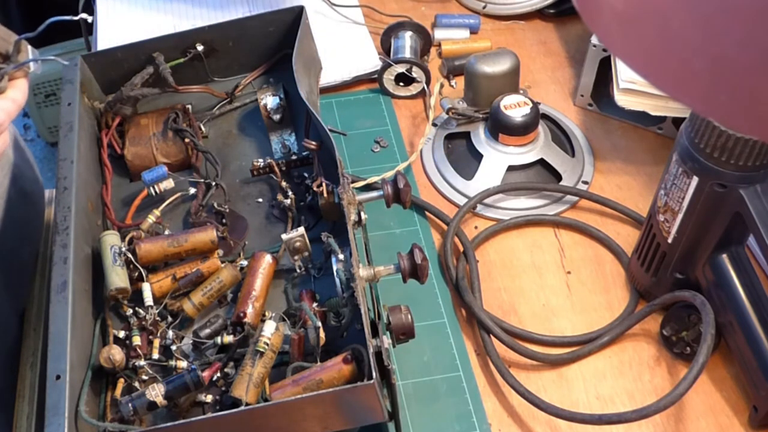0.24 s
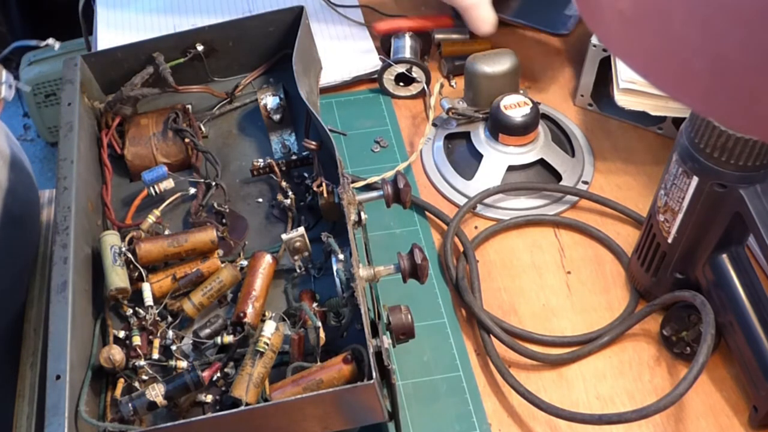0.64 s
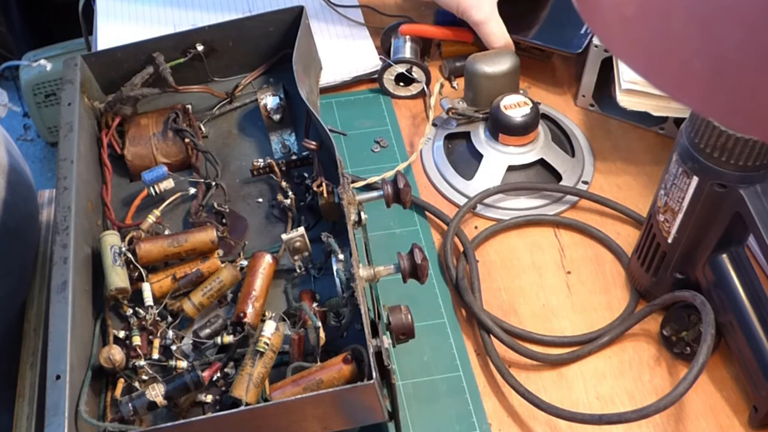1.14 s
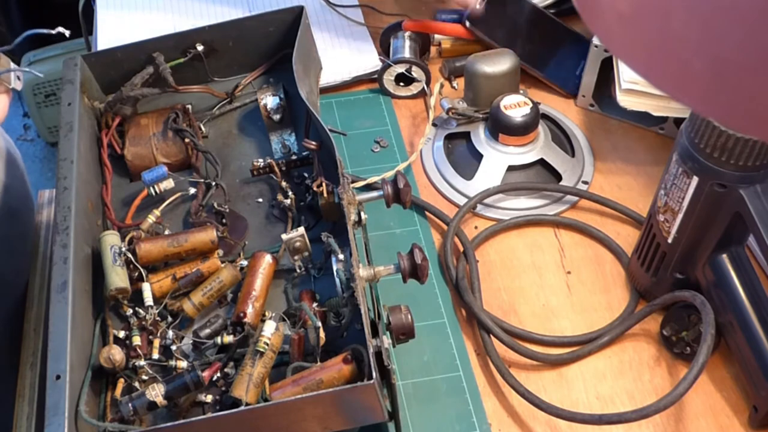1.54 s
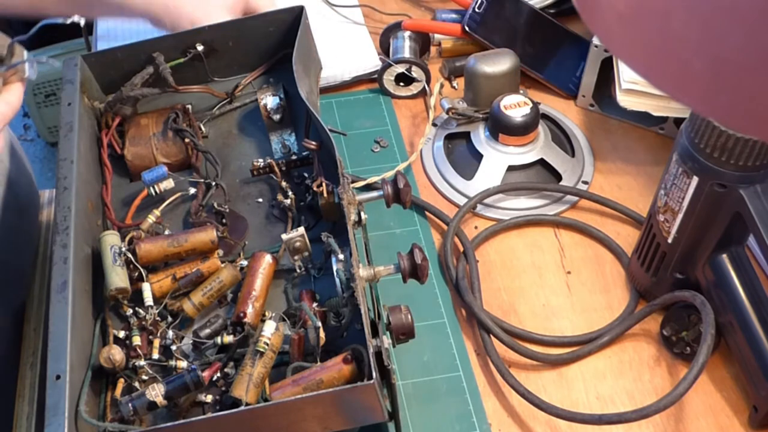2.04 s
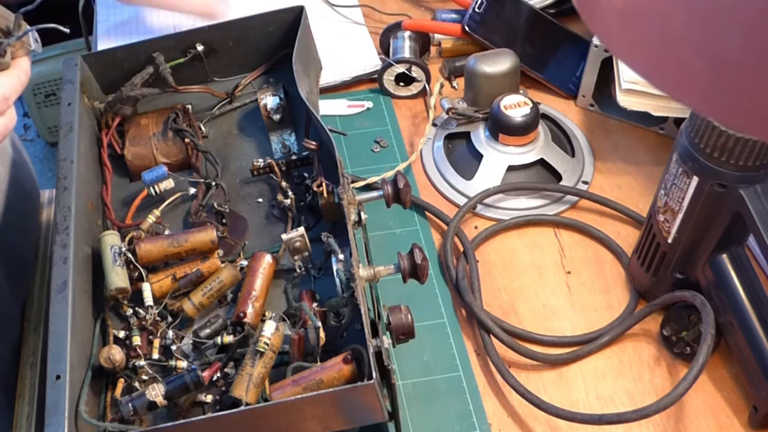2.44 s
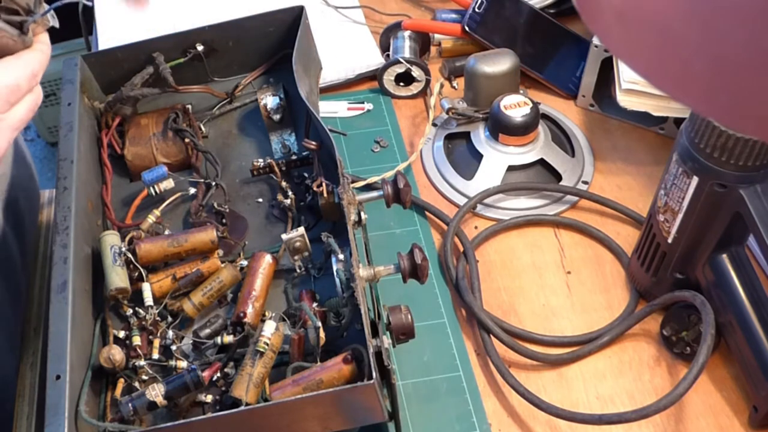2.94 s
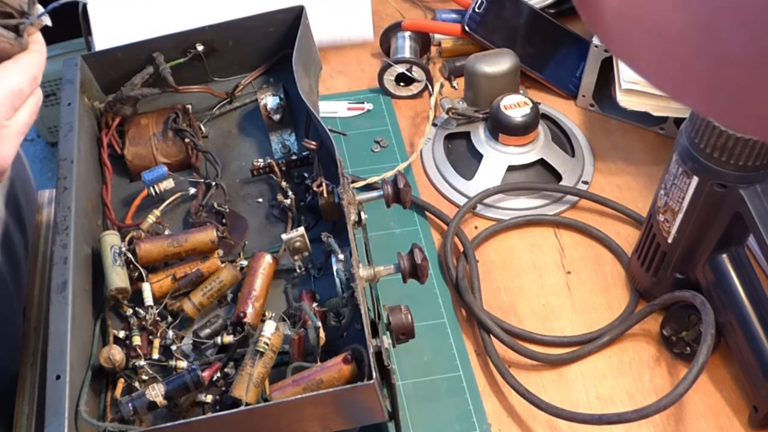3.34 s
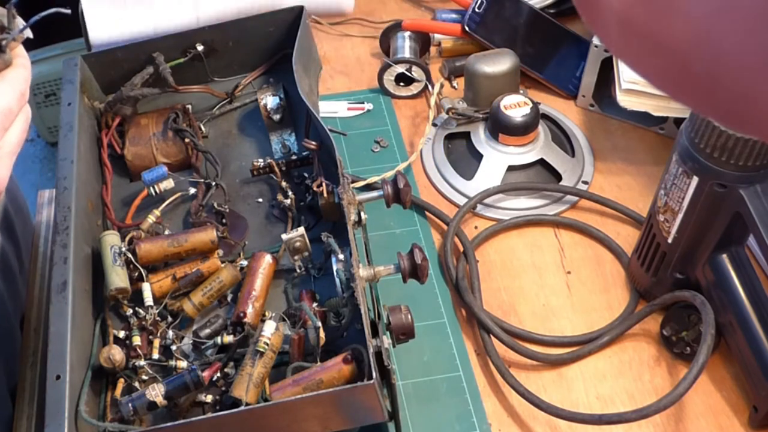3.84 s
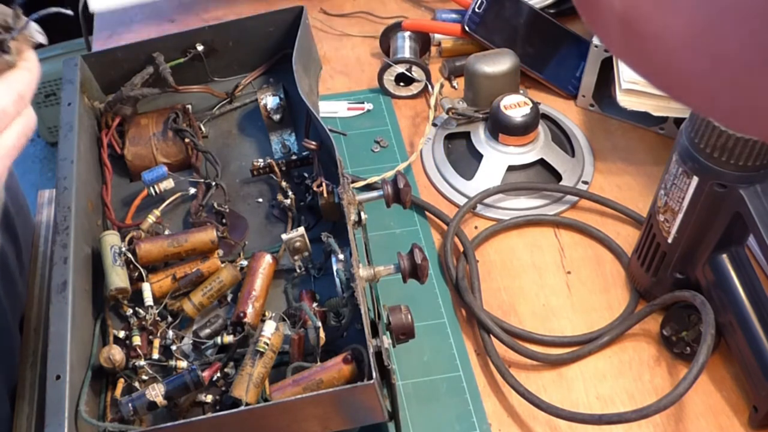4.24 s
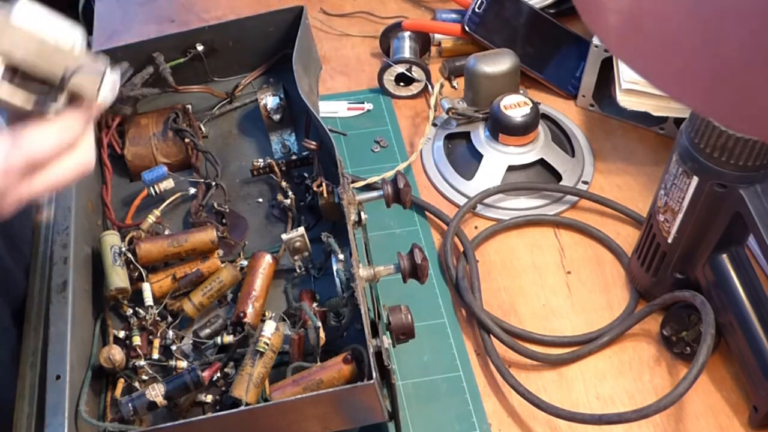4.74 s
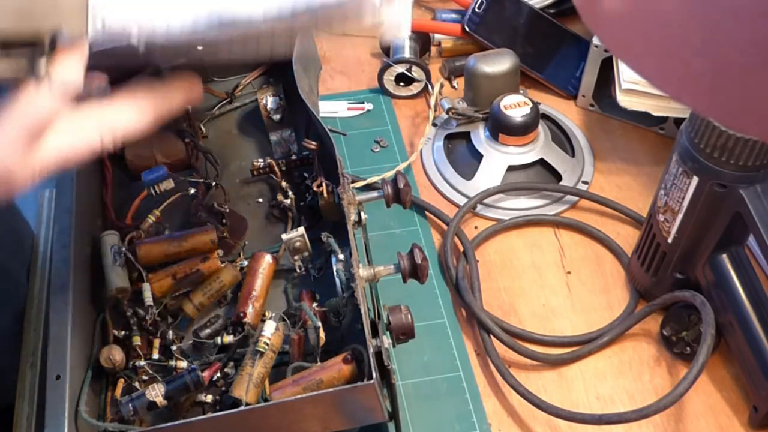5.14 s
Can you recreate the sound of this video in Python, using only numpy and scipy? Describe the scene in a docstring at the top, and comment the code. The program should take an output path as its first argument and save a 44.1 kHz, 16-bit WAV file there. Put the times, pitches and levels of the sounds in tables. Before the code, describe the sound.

A small quiet room with faint dull steady noise and a barely wavering drone; close microphone at a wooden bench, slight stereo width and short reflections. Tiny metal touches and a faint flick at 0.4-0.5 s. From 0.8 s a tablet bumps down, strongest at 0.9 and 1.35 s, low and woody with a brief clack; grainy low drags follow at 0.9-1.1 s, and more bumps at 1.53-1.61 s lead to a short judder. A bright sleeve swish lies over this until about 1.6 s. A papery brush at 1.9 s, a crisp flick at 2.23 s, then dense rustles and snaps from 2.6 to 3.6 s, with a hollow pop at 3.23 s. Two hard edge knocks ring out at 3.92 and 4.11 s, the second louder. Then near quiet: thin high squeaks at 4.5-5.3 s, a light metal clink at 5.08 s, faint taps and a final crisp rustle at 5.3-5.4 s.

```python
"""A wooden workbench in a small room, heard from close by, as space is cleared with a metal part in one hand.
A sleeve swishes and a tablet bumps and drags on the bench: ringing modes, bursts of contact and shaped noise.
Papery noise swells and fades under gain curves, sheets flick and pop; a pad taps, with two firm knocks on its edge.
Small metal clinks (damped sines) and thin squeaks (gliding tones) come between.
A faint steady room noise with a wavering drone lies under it."""
import sys
import numpy as np
from scipy import signal
from scipy.fft import rfft, irfft
from scipy.io import wavfile

SR = 44100
rng = np.random.default_rng(int(sys.argv[2]) if len(sys.argv) > 2 else 0)


def wav_record(signal):
    """Record a signal, one row per channel, as 16-bit PCM in the file named by sys.argv[1]."""
    frames = np.transpose(np.atleast_2d(signal))
    bounded = np.clip(frames, -1, 1)
    # unit amplitude maps onto the largest positive 16-bit level
    quanta = np.round(bounded * 32767).astype(np.int16)
    wavfile.write(sys.argv[1], SR, quanta)


N = 238051
TIME = np.arange(N) / SR
BLOW = np.arange(SR // 2) / SR  # time since a contact, s
ATTACK = int(.03 * SR)  # opening of a blow that sets its level, samples

# Event levels in the tables stand ahead of the final balance in scene().


def from_db(db):
    """Turns decibels into an amplitude factor."""
    return 10 ** (np.asarray(db) / 20)


def rms_one(x):
    """Scales a sound to rms 1 over its whole length."""
    return x / np.sqrt(np.mean(x ** 2) + 1e-20)


def attack_one(x):
    """Scales a blow to rms 1 over its first 30 ms."""
    return x / np.sqrt(np.mean(x[..., :ATTACK] ** 2) + 1e-20)


def at_hz(points, hz):
    """Reads a table on a log-frequency axis."""
    f, value = np.transpose(points)
    return np.interp(np.log(np.maximum(hz, 1)), np.log(f), value)


def add(out, s, sound):
    """Mixes a sound in at time s."""
    start = int(s * SR)
    out[..., start:start + sound.shape[-1]] += sound[..., :N - start]


def colour(x, spectrum):
    """Causal (minimum-phase) filter with the given spectrum, falling steeply outside it."""
    size = 4096
    hz = np.maximum(np.fft.rfftfreq(size, 1 / SR), 5)
    octaves_outside = np.abs(np.log2(hz / np.clip(hz, spectrum[0][0], spectrum[-1][0])))
    level_db = at_hz(spectrum, hz) - 18 * np.minimum(octaves_outside, 2)
    # folding the cepstrum onto positive time makes the phase minimal
    cepstrum = irfft(np.log(from_db(level_db)))
    cepstrum[1:size // 2] *= 2
    cepstrum[size // 2 + 1:] = 0
    impulse = irfft(np.exp(rfft(cepstrum)))
    return signal.fftconvolve(x, impulse)[:len(x)]


def drift(rate):
    """Slow random wander of rms 1, with new values at the given rate in Hz."""
    knots = rng.standard_normal(4096)
    return rms_one(np.interp(TIME * rate, np.arange(len(knots)), knots))


def widen(mid, side):
    """Left and right from two unrelated sounds, with a width set for each frequency."""
    # width of diffuse sound: f/Hz, side minus mid/dB
    width = [(30, -16), (100, -5.5), (280, -18), (500, -8), (1000, -2), (4000, -7.5), (8000, -5),
             (13000, -3)]
    hz = np.fft.rfftfreq(len(side), 1 / SR)
    side = irfft(rfft(side) * from_db(at_hz(width, hz)), len(side))
    return np.array([mid + side, mid - side])


def room_response(wet_db, early_db, early_s):
    """Direct sound, dense early scatter off the clutter on the bench, and a tail that dies band by band."""
    # room decay: f/Hz, t60/s
    room_t60 = [(150, 0.42), (500, 0.27), (1200, 0.3), (4000, 0.26), (12000, 0.28)]
    edges = np.geomspace(100, 16000, 8)
    tails = np.zeros((2, len(BLOW)))
    for low, high in zip(edges, edges[1:]):
        band_filter = signal.butter(2, [low, high], "band", fs=SR, output="sos")
        band = signal.sosfilt(band_filter, rng.standard_normal(tails.shape))
        tails += band * from_db(-60 * BLOW / at_hz(room_t60, np.sqrt(low * high)))
    early_boost = 1 + from_db(early_db) * np.exp(-BLOW / early_s)
    onset = np.clip(BLOW / 0.0021 - .5, 0, 1)  # scatter fades in after about 1 ms
    tails *= early_boost * onset
    response = from_db(wet_db) * widen(*tails) / np.sqrt(np.sum(tails[0] ** 2))
    response[:, 0] += 1
    return response


def heard(x, room):
    """A sound as it reaches left and right through the room."""
    return np.array([signal.fftconvolve(x, side)[:len(x)] for side in room])


def ring(modes, favoured_hz, focus_db):
    """Damped sines; the point of contact favours the modes near one pitch."""
    hz, level_db, t60 = np.transpose(modes)[:, :, None]
    focus = focus_db * np.log2(hz / favoured_hz) ** 2
    strength = from_db(level_db - focus + rng.standard_normal(hz.shape))
    sign = (-1) ** (np.arange(len(hz))[:, None] // 2)
    decay = np.exp(-np.log(1000) * BLOW / t60)
    return np.sum(sign * strength * np.sin(2 * np.pi * hz * BLOW) * decay, axis=0)


def contact(length_ms, first_db, grain_db):
    """A first touch, then a dying burst of tiny collisions as the surfaces settle."""
    length = max(length_ms, .3) / 1000
    grain = from_db(grain_db * rng.standard_normal(len(BLOW)))
    burst = rng.standard_normal(len(BLOW)) * grain * np.exp(-BLOW / length)
    burst /= np.sqrt(np.sum(burst ** 2))
    burst[0] += from_db(first_db) / np.sqrt(max(length_ms, 1))
    return burst


def gestures(rows):
    """Each row swells, holds and dies away by 20 dB per release time; one gain curve per level column."""
    gains = 0
    for start_s, attack_s, hold_s, release_s, *levels_db in rows:
        rise = np.clip((TIME - start_s) / attack_s, 0, 1)
        fall = np.clip((TIME - start_s - attack_s - hold_s) / release_s, 0, 10)
        gains = gains + from_db(levels_db)[:, None] * rise * from_db(-20 * fall)
    return gains


def friction(gain, spectrum, grain_db, catch_db):
    """Surfaces catch and let go: noise of dense uneven slips, coming in clumps."""
    clumps = from_db(grain_db * drift(600) + catch_db * drift(70))
    slips = rng.standard_normal(N) * clumps
    return gain * rms_one(colour(slips, spectrum))


def room_noise():
    """Dull steady noise with a few wavering tones in it."""
    # colour of the noise: f/Hz, level/dB
    ambience = [(15, -66), (25, -3), (37, -18.5), (144, -12.5), (371, -9.5), (513, -10.5), (1510, -18.5),
                (1870, -22.5), (2730, -28), (4820, -28), (15800, -31.5)]
    # faint wavering drone of the room: f/Hz, level/dB
    drone_tones = [(328, -72.5), (511, -70.5), (1044, -75.5)]
    noise = widen(*[colour(rng.standard_normal(N), ambience) for side in range(2)])
    drone = np.zeros(N)
    for tone_hz, level_db in drone_tones:
        hz = tone_hz + 7.25 * drift(44)  # waver in Hz
        drone += from_db(level_db) * rms_one(np.sin(2 * np.pi * np.cumsum(hz) / SR))
    return from_db(-60.5) * rms_one(noise) + drone


def squeaks():
    """As the grip slips, stick and slip locks into a thin, unsteady tone for a moment."""
    # faint squeaks: t/s, length/s, start f/Hz, end f/Hz, level/dB
    squeak_rows = [(4.5, .08, 10000, 9750, -71), (4.65, .12, 9250, 9250, -66),
                   (4.74, .09, 10300, 10500, -68), (4.84, .08, 10200, 10850, -64),
                   (5.03, .1, 11700, 12000, -68), (5.14, .17, 4700, 4700, -67)]
    out = np.zeros(N)
    for s, length_s, start_hz, end_hz, level_db in squeak_rows:
        size = int(length_s * SR)
        glide_hz = np.linspace(start_hz, end_hz, size)
        hz = glide_hz * (1 + 0.013 * drift(550)[:size])
        tone = np.sin(2 * np.pi * np.cumsum(hz) / SR)
        add(out, s, from_db(level_db) * rms_one(signal.windows.tukey(size) * tone))
    return out


def sleeve_swish():
    """Cloth brushing past in one long reach: bright friction noise."""
    # the reach: start t/s, attack/s, hold/s, release/s, level/dB
    reach = [(0.705, 0.18, .5, 0.27, -50.5)]
    # colour of the cloth: f/Hz, level/dB
    swish = [(2500, -10.5), (4500, -11), (6200, -2), (8300, 1.5), (10500, -4.5), (13000, -4.5),
             (15000, -29)]
    gain, = gestures(reach)
    return friction(gain, swish, grain_db=-0.8, catch_db=0.55)


def papery_noise():
    """Swells of clumpy noise, papery in sound: a bright hiss and a lower rasp, each with its own level."""
    # swells, two of them starting just ahead of the pad's firm knocks:
    # start t/s, attack/s, hold/s, release/s, hiss level/dB, rasp level/dB
    swells = [(1.863, 0.013, 0.053, 0.071, -47, -52), (2.182, 0.01, 0.013, 0.044, -57.5, -71),
              (2.232, 0.0091, 0.018, 0.081, -41.5, -51.5), (2.634, 0.01, .008, 0.067, -44.5, -55),
              (2.718, 0.025, 0.0091, 0.047, -42.5, -44), (2.765, 0.017, 0.015, 0.084, -41, -44),
              (2.89, 0.016, 0.017, 0.046, -57, -54.5), (2.918, 0.04, 0.018, 0.13, -37.5, -46.5),
              (3.0, 0.057, 0.018, 0.2, -46, -44.5), (3.23, 0.11, 0.021, 0.063, -42.5, -42.5),
              (3.36, 0.056, .025, 0.19, -51, -65), (3.47, 0.079, 0.031, 0.081, -41.5, -59.5),
              (3.648, 0.0076, .012, 0.21, -50.5, -51), (3.913, 0.0063, 0.0084, 0.1, -34, -31.5),
              (4.101, 0.0053, 0.003, 0.013, -34.5, -31), (4.45, .22, .02, 0.64, -63.5, -60.5),
              (4.86, 0.11, 0.04, .1, -60, -59.5), (5.08, 0.14, 0.086, .1, -62, -59.5),
              (5.31, 0.028, .015, 0.058, -46, -56.5), (5.375, 0.01, .015, .05, -44, -53.5)]
    # colours: f/Hz, level/dB
    hiss_colour = [(2200, -11.5), (3300, -15), (5000, 0), (7000, 1), (9500, 2), (12000, -2.5), (15000, -18)]
    rasp_colour = [(130, -11.5), (330, 0.5), (550, 3), (1050, 0.5), (1800, -1.5), (3100, -6.5), (4500, -4)]
    hiss_gain, rasp_gain = gestures(swells)
    hiss = friction(hiss_gain, hiss_colour, grain_db=2.0, catch_db=1.84)
    rasp = friction(rasp_gain, rasp_colour, grain_db=1.5, catch_db=2.0)
    return hiss + rasp


def clinks(room):
    """Light touches on metal, damped by the fingers: a brief scuff and a short ring."""
    # the part touching things: t/s, level/dB, favoured f/Hz
    touches = [(0.405, -70, 4200), (0.518, -63, 1320), (5.0752, -46, 3350), (5.087, -50, 1150)]
    # ringing of the metal part: f/Hz, level/dB, t60/s
    metal_modes = [(1244, 0, .06), (1580, -7, .04), (2150, -9, .025), (2466, -2, .04), (3246, 2, .035),
                   (3924, -7, .045), (4818, -7, .06), (6605, -3, .04), (7278, -1, .05)]
    out = np.zeros((2, N))
    for s, level_db, favoured_hz in touches:
        metal = attack_one(heard(ring(metal_modes, favoured_hz, focus_db=9.5), room))
        scuff_colour = [(favoured_hz / 2, -10), (favoured_hz, 0), (favoured_hz * 2, -5)]
        touch = contact(length_ms=3.3, first_db=1.0, grain_db=-0.5)
        scuff = attack_one(heard(colour(touch, scuff_colour), room))
        add(out, s, from_db(level_db) * (metal + scuff) / np.sqrt(2))
    return out


def paper_snaps(room):
    """A sheet buckles and flicks: the fold crackles and the free paper flaps."""
    # buckles: t/s, flap level/dB, crackle level/dB, decay time/ms
    buckles = [(0.465, -66, -64, 3.1), (0.895, -37.5, -52, 3), (1.586, -52, -54, 5.6),
               (2.23, -59, -30, 5.3), (2.291, -46, -62, 2.8), (2.741, -39.5, -37.5, 6),
               (2.991, -37, -41, 4.3), (3.075, -36.5, -38.5, 2.1), (3.5476, -62, -41, 5.4),
               (3.883, -71, -59, 0.58), (4.603, -71, -56.5, 0.5), (4.619, -76, -62, 1.2),
               (5.1355, -57, -56.5, 3.9), (5.385, -49.5, -47.5, 6.3)]
    # colours: f/Hz, level/dB
    flap_colour = [(200, -18), (400, -9), (900, 3), (1600, 1), (3000, -1), (4500, -20.5)]
    crackle_colour = [(2000, -14), (3300, -7), (4400, -1), (6200, 1), (10000, -2), (12000, -7),
                      (14000, -14), (15500, -20)]
    out = np.zeros((2, N))
    for s, flap_db, crackle_db, length_ms in buckles:
        buckle = contact(length_ms, first_db=-4.0, grain_db=4.0)
        flap = attack_one(heard(colour(buckle, flap_colour), room))
        crackle = attack_one(heard(colour(buckle, crackle_colour), room))
        add(out, s, from_db(flap_db) * flap + from_db(crackle_db) * crackle)
    return out


def paper_pop(room):
    """The bent stack pops through; a cushion of air between the sheets gives the snap its hollow pitch."""
    # the pop: t/s, level/dB, decay time/ms
    s, level_db, length_ms = (3.2275, -32, 1.4)
    # its hollow colour: f/Hz, level/dB
    hollow = [(230, -24), (340, -7), (425, -0.5), (520, -6), (640, 3), (760, -14), (1500, -15),
              (3000, -22.5), (7000, -23), (12000, -37.5)]
    out = np.zeros((2, N))
    burst = contact(length_ms, first_db=10.0, grain_db=-3.0)
    add(out, s, from_db(level_db) * attack_one(heard(colour(burst, hollow), room)))
    return out


def tablet_drags():
    """The tablet's edge drags and judders on the bench after a bump: low, grainy friction."""
    # drags: start t/s, attack/s, hold/s, release/s, level/dB
    drag_rows = [(0.92, 0.016, .004, 0.096, -36.5), (1.025, 0.037, 0.009, .11, -36.5),
                 (1.62, 0.039, .006, 0.085, -43)]
    # colour of the rumble: f/Hz, level/dB
    rumble = [(110, -22), (180, -21), (220, 4), (255, -7), (345, -18), (450, -13), (600, -27)]
    gain, = gestures(drag_rows)
    return friction(gain, rumble, grain_db=3.0, catch_db=1.5)


def knocks(rows, modes, clack_colour, tick_colour, room, near_room, focus_db, first_db, press):
    """Each blow bends the bench, rings the object's low modes, and rattles its dense upper ones."""
    # bending of the bench top: f/Hz, level/dB, t60/s
    bench_modes = [(77, -18, 0.38), (104.7, -12.5, 0.39), (130.2, -3, 0.2), (173.7, -8, 0.3),
                   (196, -1, 0.23), (215.6, 0, 0.3)]
    out = np.zeros((2, N))
    for s, knock_db, clack_db, tick_db, length_ms, favoured_hz in rows:
        # the bench takes a share of each knock: 4.5 dB more per doubling of the contact length
        thump_db = knock_db - 10.5 + 4.5 * np.log2(length_ms / 4.07)
        push = 1 - np.exp(-BLOW * 1000 / (press * length_ms))  # longer contacts press in more slowly
        thump = attack_one(push * ring(bench_modes, favoured_hz, focus_db=0.4))
        knock = attack_one(heard(push * ring(modes, favoured_hz, focus_db), near_room))
        rattle = push * contact(length_ms, first_db, grain_db=1.5)
        clack = attack_one(heard(colour(rattle, clack_colour), room))
        touch = contact(length_ms, first_db, grain_db=-3.5)
        tick = attack_one(heard(colour(touch, tick_colour), room))
        low = from_db(thump_db) * thump + from_db(knock_db) * knock
        high = from_db(clack_db) * clack + from_db(tick_db) * tick
        add(out, s, low + high)
    return out


def tablet_bumps(room, near_room):
    """The tablet bumps down on the bench, its modes focused round the pitch of each contact."""
    # bumps: t/s, knock level/dB, clack level/dB, contact tick level/dB, contact length/ms, favoured f/Hz
    bumps = [(0.7875, -32, -36.5, -46, 5.2, 373), (0.811, -38, -38, -48.5, 6.5, 604),
             (0.8918, -21, -32.5, -36, 4.6, 310), (1.02, -42.5, -52, -66, 16, 260),
             (1.138, -47, -62.5, -72, 17, 301), (1.2085, -40.5, -34, -71, 7.2, 517),
             (1.3445, -20.5, -31, -35.5, 12, 387), (1.376, -28, -50, -68, 3.1, 380),
             (1.534, -29.5, -44, -60.5, 6, 310), (1.568, -35, -41.5, -67, 4.9, 400),
             (1.6135, -30, -37.5, -54, 5.1, 326)]
    # the tablet lying on the bench: f/Hz, level/dB, t60/s
    modes = [(301.4, -2.5, 0.17), (334.8, 1.5, 0.13), (361, -13.5, 0.2), (409.4, -5.5, 0.16),
             (442, -4.5, 0.12), (515, -14, 0.2), (624.5, -7.5, 0.15), (662, -9, 0.12), (753, -15, 0.18),
             (870, -11, 0.23)]
    # colours: f/Hz, level/dB
    clack_colour = [(400, -7), (650, 1), (900, 3), (1150, -2.5), (1400, -2), (2000, -6), (2600, -17),
                    (3600, -31)]
    tick_colour = [(2000, -14), (3200, -2), (5500, -6), (7500, -4), (9600, 2), (11500, -4), (15000, -15)]
    return knocks(bumps, modes, clack_colour, tick_colour, room, near_room,
                  focus_db=6.5, first_db=-14.0, press=0.18)


def pad_taps(room, near_room):
    """The pad taps the bench on its edge, with a sharp first touch and many modes ringing."""
    # taps: t/s, knock level/dB, clack level/dB, contact tick level/dB, contact length/ms, favoured f/Hz
    taps = [(2.231, -47, -53, -69, 4.7, 260), (2.3145, -46, -48.5, -58, 2.6, 260),
            (2.5295, -58, -52.5, -55, 4.7, 400), (2.828, -52.5, -44, -46, 6.6, 700),
            (3.485, -54.5, -48.5, -64, 3, 900), (3.6585, -47.5, -41.5, -42.5, 5.2, 275),
            (3.9235, -26, -25.5, -34.5, 3.2, 530), (4.1101, -21, -19.5, -30, 1.95, 490),
            (5.137, -55.5, -56, -63, 2.5, 218), (5.233, -55, -76, -63, 4, 220),
            (5.288, -58, -71, -72, 4, 260)]
    # the pad standing on the bench: f/Hz, level/dB, t60/s
    modes = [(296, -9, .13), (339, 5, .17), (425, -10, .15), (458, -2, .15), (510, -4, .16), (598, -6, .17),
             (660, -1, .15), (808, -5, .18), (858, -3, .12), (1000, -7, .12), (1224, -5, .22),
             (1322, -4, .28), (1510, -5, .21), (1600, -6, .21), (1710, -7, .18), (1930, -5, .16),
             (2256, -13, .14)]
    # colours: f/Hz, level/dB
    clack_colour = [(400, -18), (640, 1), (850, 0), (1100, -3), (1350, 1), (1900, -3), (2450, -14),
                    (3600, -21)]
    tick_colour = [(2000, -12), (3300, -3), (4100, 1), (4900, 2), (6400, -3), (9000, -7), (12000, -14),
                   (15000, -25)]
    return knocks(taps, modes, clack_colour, tick_colour, room, near_room,
                  focus_db=2.0, first_db=-1.0, press=.12)


def scene():
    """Knocks, paper, metal and sleeve in the room, balanced over its steady noise."""
    room = room_response(wet_db=-3.5, early_db=6.0, early_s=0.0041)
    near_room = room_response(wet_db=-11.0, early_db=-3.5, early_s=0.0094)
    pop_room = room_response(wet_db=-4.5, early_db=7.0, early_s=0.011)
    soft_room = room_response(wet_db=-6.5, early_db=16.0, early_s=0.0063)

    soft = heard(papery_noise() + sleeve_swish() + squeaks(), soft_room)
    paper = from_db(-2.5) * paper_snaps(room) + paper_pop(pop_room)
    tablet = tablet_bumps(room, near_room) + tablet_drags()
    pad = from_db([[-.4], [.2]]) * pad_taps(room, near_room)  # left and right trim, dB
    handling = from_db(-2.0) * soft + clinks(room) + paper + tablet + pad
    # small objects radiate almost no deep bass
    bass_cut = signal.butter(3, 81, "high", fs=SR, output="sos")
    handling = signal.sosfilt(bass_cut, handling)
    return handling * from_db([[-.2], [.2]]) + room_noise()


def record(dry):
    """The top is cut steeply above 15.9 kHz."""
    top_cut = signal.ellip(10, .2, 80, 15900, fs=SR, output="sos")
    return signal.sosfilt(top_cut, dry)


dry = scene()
out = record(dry)
wav_record(out)
```